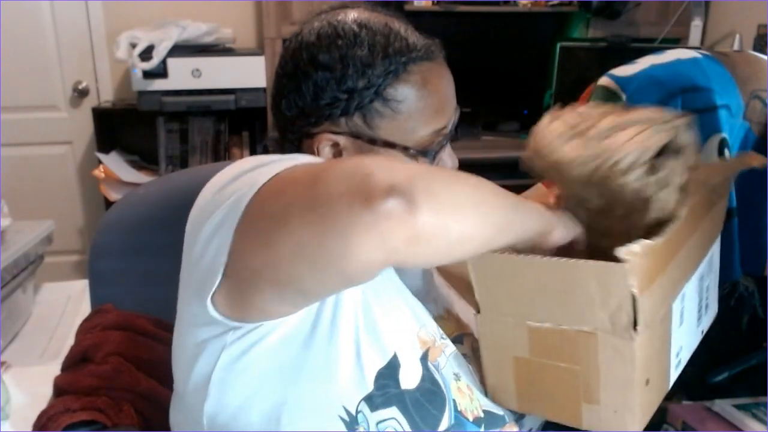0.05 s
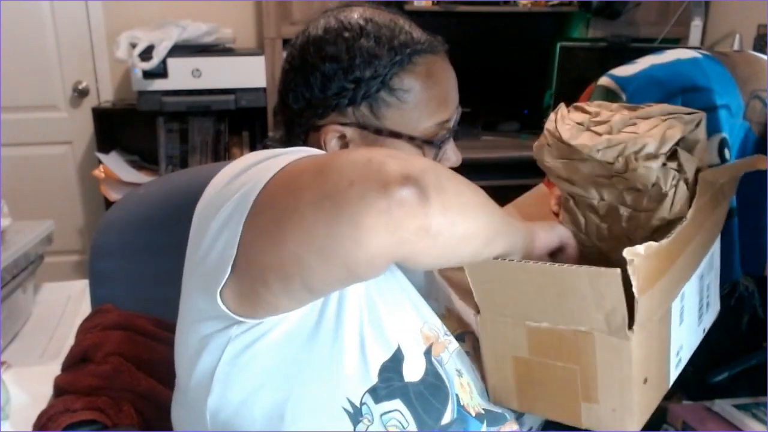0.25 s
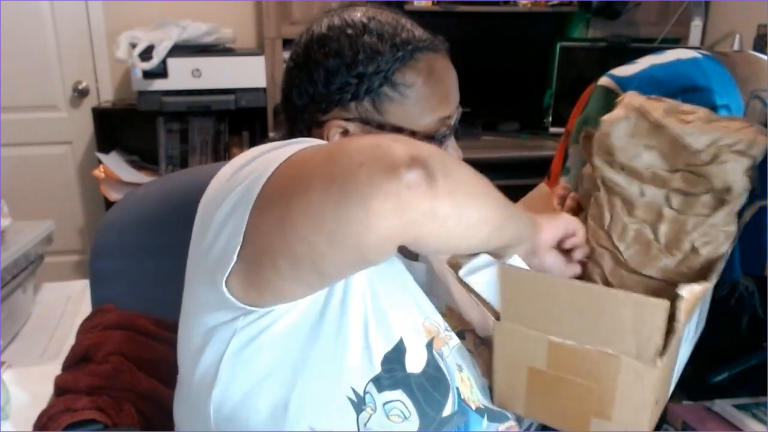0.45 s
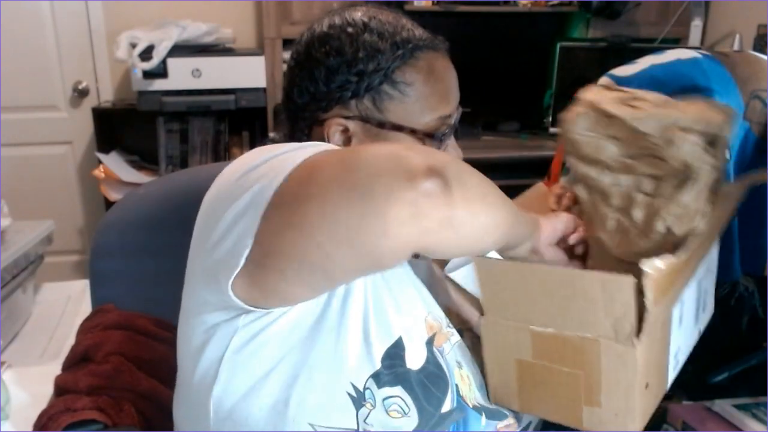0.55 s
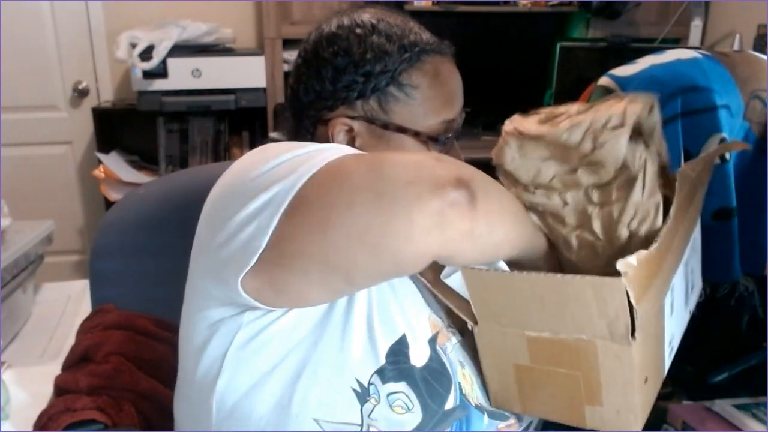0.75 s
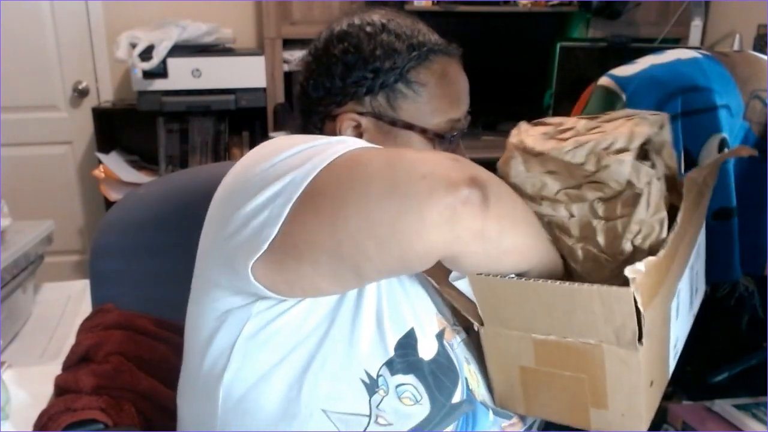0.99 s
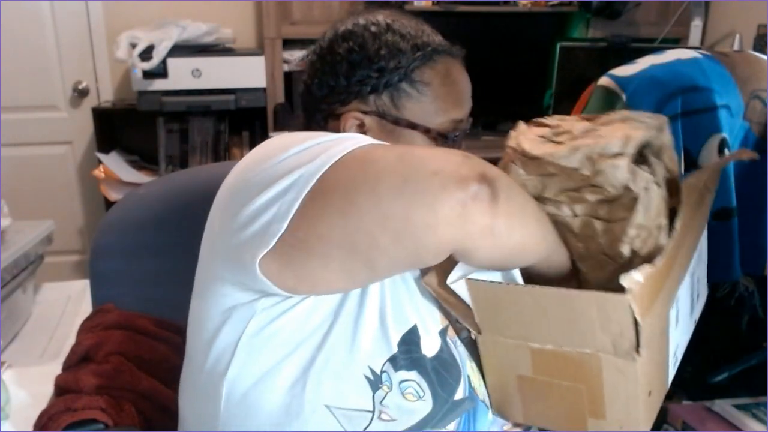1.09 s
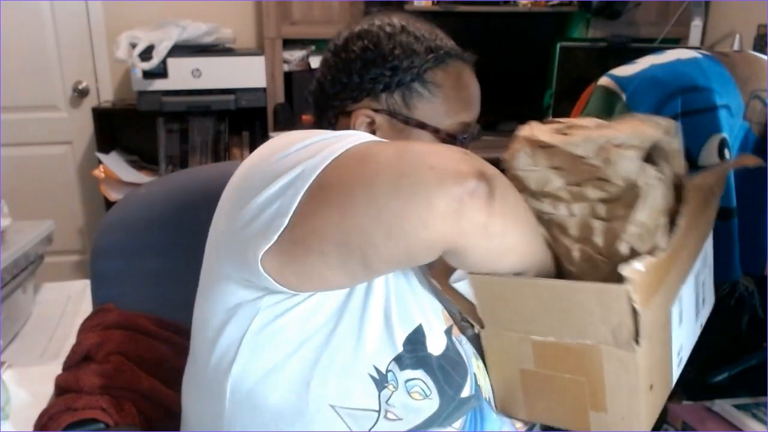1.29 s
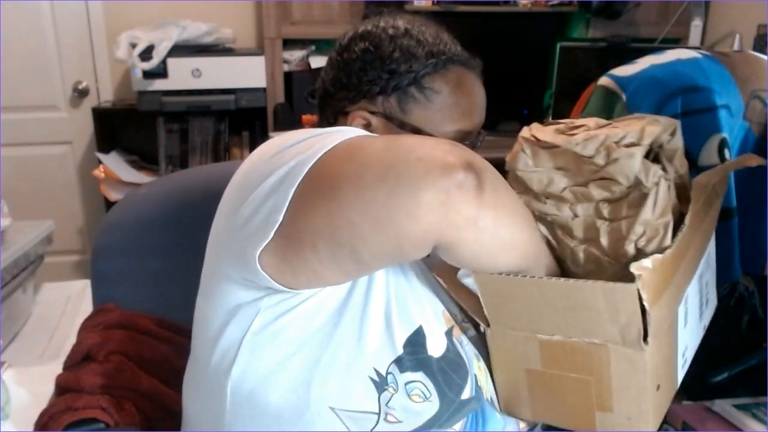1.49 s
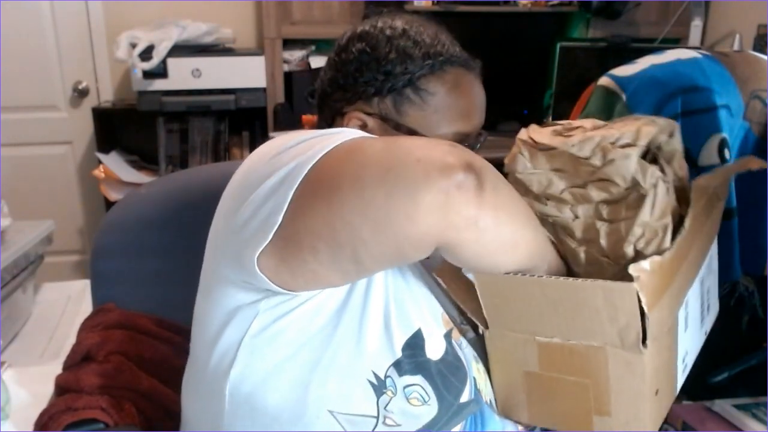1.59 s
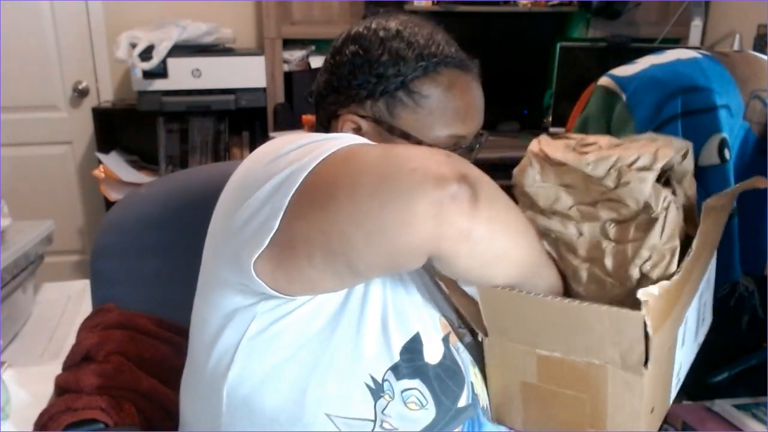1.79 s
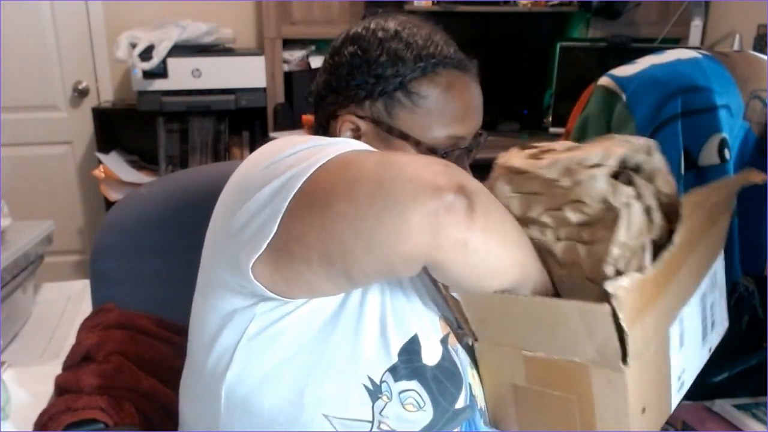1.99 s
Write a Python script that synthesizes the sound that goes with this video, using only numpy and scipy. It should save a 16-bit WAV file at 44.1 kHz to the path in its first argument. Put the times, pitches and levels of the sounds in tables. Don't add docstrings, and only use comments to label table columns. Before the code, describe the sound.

Crumpled kraft paper crunches and snaps as a hand digs in a cardboard box, knocking its sides

```python
import sys
import numpy as np
from scipy import signal
from scipy.fft import rfft, irfft, next_fast_len
from scipy.io import wavfile
from scipy.ndimage import uniform_filter1d

SR = 44100
rng = np.random.default_rng(int(sys.argv[2]) if len(sys.argv) > 2 else 0)


def boost(x):
    u = np.asarray(x, float) / 20
    return 10 ** u


def wav_out(sig):
    wavfile.write(sys.argv[1], SR, np.round(np.clip(np.atleast_2d(sig).T, -1, 1) * 32767).astype(np.int16))


N = 90404


def evened(x):
    return x / np.sqrt(np.mean(x ** 2) + 1e-20)


def read(points, hz):
    point_hz, value = np.transpose(points)
    return np.interp(np.log(hz + 1), np.log(point_hz + 1), value)


def add(mix, start_s, sound):
    part = mix[round(start_s * SR):][:len(sound)]
    part += sound[:len(part)]


def coloured(x, points):
    return irfft(rfft(x) * boost(read(points, np.fft.rfftfreq(N, 1 / SR))), N)


def resonate(x, hz, width):
    turn = np.exp(2j * np.pi * hz * np.arange(len(x)) / SR)
    r = np.exp(-np.pi * width / SR)
    return 2 * (turn * signal.lfilter([1 - r], [1, -r], x / turn)).real


def resonate_twice(x, hz, width):
    return resonate(resonate(x, hz, width), hz, width)


def clicks(per_s, spread_db):
    size = boost(spread_db * np.minimum(rng.exponential(1, N), 4)) * rng.choice([-1., 1.], N)
    return size * (rng.random(N) < per_s / SR)


def force(rows):
    rise_db, fall_db = 14.5, 20.5
    t, power = np.arange(N) / SR, np.zeros(N)
    for start, rise, fall, db in rows:
        late = t - start - rise
        falling = -fall_db * (np.maximum(late, 0) / fall) ** 1.18
        power += boost(db + np.where(late < 0, rise_db * late / rise, falling)) ** 2
    return np.sqrt(power)


# (frequency [Hz], density [dB per Hz])
PAPER = [(290, -6), (600, -15.5), (1000, -7.5), (2200, -8.5), (4000, -8), (7000, -16.5), (9000, -25.5),
         (15500, -26.5)]
# (start [s], rise [s], fall [s], force [dB])
SQUEEZES = [(-.02, 0.0078, 0.088, -30.5), (.075, 0.0036, 0.15, -33.5), (.196, 0.0067, 0.022, -44),
            (.21, 0.028, 0.048, -16.5), (.26, 0.021, 0.1, -19.5), (.32, 0.015, 0.036, -41),
            (.40, 0.022, 0.12, -37.5), (.465, 0.017, 0.24, -30.5), (.56, 0.01, 0.073, -26),
            (.58, 0.0054, 0.18, -30.5), (.63, 0.045, 0.073, -24.5), (.70, 0.035, 0.013, -26.5),
            (.805, 0.0076, 0.059, -47), (.875, 0.026, 0.2, -44.5), (.95, 0.09, 0.12, -38),
            (1.035, 0.035, 0.051, -25.5), (1.055, 0.029, 0.1, -29.5), (1.14, 0.014, 0.084, -30),
            (1.195, 0.0097, 0.1, -34), (1.3, 0.024, 0.23, -52), (1.4, 0.028, 0.048, -47),
            (1.52, 0.026, 0.053, -50), (1.57, 0.01, 0.056, -49), (1.735, 0.0087, .03, -50),
            (1.745, 0.03, 0.19, -41.5), (.14, 0.0078, .09, -37.5), (1.82, 0.027, 0.037, -47),
            (1.97, 0.036, 0.11, -47)]


def crackle():
    creases_per_s, spread_db, slide_db, level_db = 2100, 3, -5.5, -1
    ring_cycles = 2.24
    grains, t = np.zeros(N), np.arange(600) / SR
    for hz in np.geomspace(700, 14000, 24):
        grain = np.sin(2 * np.pi * hz * t) * np.exp(-t * hz / ring_cycles)
        slips = clicks(creases_per_s / 24, spread_db)
        grains += signal.oaconvolve(slips, grain * np.sqrt(hz))[:N]
    paper = evened(grains) + boost(slide_db) * rng.standard_normal(N)
    return boost(level_db) * force(SQUEEZES) * evened(coloured(paper, PAPER))


# (time [s], peak level [dB], pitch [Hz], burst length [s])
SNAPS = [(.0785, -12, 1950, 0.00098), (0.1997, -22.5, 2270, 0.0063), (0.2324, -7, 5400, 0.0078),
         (0.2375, -14, 1600, 0.002), (0.2462, -5, 5300, .002), (0.266, -12.5, 2900, 0.0039),
         (0.299, -12.5, 4300, 0.0051), (0.332, -15, 2580, 0.0082), (0.4893, -10, 3380, 0.00087),
         (0.5636, -5.5, 3770, 0.00094), (0.5669, -10, 2430, 0.0028), (0.5688, -4.5, 3940, 0.0015),
         (0.5656, -7.5, 6010, 0.0019), (.5840, -6, 2350, 0.00092), (.808, -34.5, 1020, 0.0015),
         (1.0422, -22.5, 5150, 0.0068), (1.147, -22, 3400, 0.0041), (1.8388, -30.5, 5300, 0.0012),
         (0.0787, -16, 3900, 0.00076), (.2867, -19.5, 2120, 0.0018), (0.473, -25.5, 2950, 0.0026),
         (0.651, -22.5, 2470, 0.0041), (.8994, -43, 2180, .003), (1.0221, -31, 2600, .003),
         (1.2067, -36, 4000, 0.0026), (1.5812, -41.5, 6000, .001), (1.636, -57, 9000, 0.0011),
         (1.877, -35, 1680, 0.0012), (1.902, -46, 5960, .001), (1.996, -38.5, 3170, .002)]


def snaps():
    level_db, edge_db, relative_width = 1, -20, 0.5
    out, t = np.zeros(N), np.arange(900) / SR
    for start, db, hz, burst in SNAPS:
        drive = rng.standard_normal(900) * np.exp(-(t / max(burst, 3e-4)) ** 2)
        drive[0] += 3.
        ring = evened(resonate_twice(drive, hz, relative_width * hz))
        sound = ring + boost(edge_db) * evened(drive)
        add(out, start, boost(db + level_db) * sound / abs(sound).max())
    return out


def stick_slip(length, db, hz, relative_width):
    t = np.arange(0, 2.02 * length, 1 / SR)
    drive = rng.standard_normal(len(t))
    noise = evened(resonate_twice(drive, hz, relative_width * hz))
    tone = 1.18 * np.sin(2 * np.pi * (hz * t + drive[0]))
    swell = np.sin(np.pi * (t / t[-1]) ** 0.6)
    return boost(db) * swell * evened(noise + tone)


# (start [s], length [s], level [dB], pitch [Hz])
RUBS = [(0.235, 0.006, -21, 1150), (.575, 0.012, -28, 1060), (.718, 0.011, -26.5, 2300),
        (1.037, 0.0068, -14, 1106), (1.055, 0.028, -26.5, 1270), (1.145, 0.0173, -22, 1485),
        (1.197, 0.019, -28.5, 1094), (1.413, 0.032, -48, 1330), (1.578, 0.022, -50.5, 1002),
        (1.677, 0.022, -46, 563), (1.758, 0.036, -38.5, 1520), (1.815, 0.042, -42, 1510),
        (1.86, 0.048, -43.5, 696), (1.986, 0.0228, -48.5, 1000), (1.15, 0.042, -34.5, 673),
        (0.861, 0.016, -47, 1000), (.935, 0.034, -41, 1150), (1.748, 0.0207, -39.5, 414),
        (1.793, 0.038, -35.5, 378), (1.882, .035, -41, 419), (2.028, 0.018, -43, 410),
        (.081, 0.025, -36.5, 2045), (.082, 0.042, -38.5, 1000), (.203, 0.015, -27.5, 430),
        (1.002, 0.012, -29, 1060), (1.199, 0.0066, -25, 1460), (.235, 0.013, -21.5, 2250),
        (.563, 0.0054, -24, 1110), (1.062, 0.022, -29, 540), (.66, 0.039, -27, 270),
        (1.31, 0.045, -49.5, 1400), (1.3, .035, -41.5, 390), (1.24, 0.024, -40, 1000),
        (1.143, 0.011, -32, 3550), (.197, .009, -30, 2200), (.27, .02, -26, 2200), (.33, .045, -36.5, 2200),
        (.655, 0.021, -30, 2450), (1.61, 0.048, -56.5, 1450), (1.45, .04, -51, 400),
        (1.068, .02, -31, 2800), (.69, 0.013, -24.5, 560), (.562, .006, -20, 3950),
        (1.836, .006, -44, 5200), (.91, .03, -46, 620)]


def rubs():
    out = np.zeros(N)
    for start, length, db, hz in RUBS:
        add(out, start, stick_slip(length, db, hz, 0.14))
    return out


# (time [s], peak level [dB], pitch [Hz])
KNOCKS = [(0.251, 2.5, 352), (.236, -4, 355), (0.2858, 3, 345), (0.299, -5, 608), (0.3, -13, 325),
          (0.33, -1.5, 338), (0.679, -10, 402), (0.699, -10.5, 556), (0.712, -18, 320), (0.73, -14, 394),
          (0.7, -17, 350), (0.64, -21, 380), (0.963, -20.5, 367), (1.005, -10, 340), (1.08, -15.5, 450),
          (1.0415, -6.5, 405), (1.362, -30, 375), (1.544, -32, 353)]


def knocks():
    level_db, whole_box_db, t60_s, contact_s = -2.5, -5.5, 0.053, 0.0028
    out, t = np.zeros(N), np.arange(6000) / SR
    for start, db, hz in KNOCKS:
        ring = np.sin(2 * np.pi * hz * t)
        ring += boost(whole_box_db) * np.sin(2 * np.pi * 0.41 * hz * t)
        ring += 0.31 * np.sin(2 * np.pi * 1.58 * hz * t)
        decay = boost(db + level_db - 60 * t / t60_s)
        add(out, start, decay * np.minimum(t / contact_s, 1) * ring)
    return out


# (frequency [Hz], width [Hz], level [dB])
BOX = [(138, 80, -6), (295, 81.6, -4.5), (358.4, 38, 2.5), (392.8, 40, -9.5), (548.4, 40, -7),
       (1015, 370, -18.5), (1151, 140, -13.5)]
# (start [s], rise [s], fall [s], force [dB])
PUSHES = [(-.03, 0.022, 0.062, -20), (.12, 0.019, 0.046, -43), (.195, 0.035, 0.12, -21.5),
          (.235, 0.0065, 0.1, -14), (.29, 0.017, 0.052, -13.5), (.46, 0.062, 0.03, -33.5),
          (.56, 0.053, 0.12, -26), (.63, 0.075, 0.017, -18), (.7, 0.016, 0.03, -19),
          (.9, 0.053, 0.086, -34.5), (1.0, 0.0089, 0.064, -18), (1.04, 0.014, 0.073, -21.5),
          (1.15, 0.077, 0.18, -32), (1.29, 0.058, 0.015, -41), (1.42, 0.087, 0.057, -48.5),
          (1.74, 0.027, 0.093, -40.5), (1.79, 0.038, 0.13, -40.5), (1.87, 0.046, 0.029, -37.5),
          (2.0, 0.048, 0.035, -40)]


def box():
    scuffs_per_s, spread_db, level_db = 500, 3, -1.5
    drive = evened(clicks(scuffs_per_s, spread_db)) + 0.23 * rng.standard_normal(N)
    body = np.zeros(N)
    for hz, width, db in BOX:
        body += boost(db) * evened(resonate_twice(drive, hz, 1.46 * width))
    return boost(level_db) * force(PUSHES) * evened(body)


# (start [s], length [s], level [dB], pitch [Hz])
ROCKS = [(.235, 0.078, -22, 130.7), (0.24, 0.088, -39, 57.6), (.46, 0.057, -35.5, 121.5),
         (.57, 0.061, -32, 165), (.66, 0.031, -63, 112), (1.0, 0.069, -38, 135), (1.28, 0.038, -43, 123),
         (1.4, 0.113, -41.5, 54.4), (1.535, 0.027, -41, 124), (0.072, 0.048, -42.5, 119),
         (1, 0.039, -41, 108), (0.34, .045, -36.5, 161), (.287, .035, -26, 220), (.415, .025, -42, 180),
         (1.27, 0.022, -43, 152), (.76, 0.083, -52.5, 125), (1.04, 0.028, -29, 280)]


def rocks():
    out = np.zeros(N)
    for start, length, db, hz in ROCKS:
        add(out, start, stick_slip(length, db, hz, 0.13))
    return out


# (frequency [Hz], density [dB per Hz])
AIR = [(20, 3.5), (60, 2), (250, -11.5), (560, -13.5), (1500, -22.5), (6000, -29.5), (9000, -45),
       (15500, -43)]


def air():
    return boost(-49) * evened(coloured(rng.standard_normal(N), AIR))


# (frequency [Hz], t60 [s])
ROOM = [(100, 0.056), (1000, .12), (12000, 0.099)]


def room(x):
    taps = np.zeros((2, SR // 2))
    starts = np.arange(60, SR // 2 - 20, 20)
    places = starts + rng.integers(0, 20, (2, len(starts)))
    np.put_along_axis(taps, places, rng.choice([-1., 1.], (2, len(starts))), 1)
    hz, t, z = signal.stft(taps, SR, nperseg=128)
    same = np.clip(900 / (hz + 300), 0, 1)[:, None]
    z[1] = same * z[0] + np.sqrt(1 - same ** 2) * z[1]
    decay = boost(-60 * t / read(ROOM, hz)[:, None])
    tail = signal.istft(z * (hz[:, None] > 200) * decay, SR, nperseg=128)[1]
    return boost(-5) * signal.fftconvolve(x[None], tail / np.linalg.norm(tail[0]), axes=1)[:, :N]


def ports(x, share):
    gap_s, left_db, spread, scatter_hz = 5.5e-5, -1.7, 0.6, 231
    size = next_fast_len(N + 4096)
    hz = np.fft.rfftfreq(size, 1 / SR)
    smooth = round(scatter_hz * size / SR)
    wobble = uniform_filter1d(rng.standard_normal(len(hz)), smooth)
    wobble = evened(uniform_filter1d(wobble, smooth))
    scatter = share * spread * 3.9 * hz / (hz + 4000) * np.tanh(1.5 * wobble)
    turn = np.exp(-1j * (np.pi * hz * gap_s + scatter))
    pair = irfft(rfft(x, size) * np.array([turn, 1 / turn]), size)[:, :N]
    return boost([[left_db / 2], [-left_db / 2]]) * pair


def scene():
    front, far_side = crackle(), crackle()
    near = snaps() + rubs() + knocks() + box() + rocks()
    direct = ports(near + air(), -0.4) + ports(front, 0.78) + ports(far_side, 0.95)
    return direct + room(near + front + far_side)


# (time [s], port [0 left, 1 right], jump [full scale])
OVERFLOWS = [
    (.24042, 0, .9),
    (.25347, 1, .9),
    (.25351, 0, 1.4),
    (.28805, 1, 1.6),
    (.28815, 0, 2),
    (.29212, 0, 1),
]


def overflows(full):
    width_s = 2.6e-5
    t, jumps = np.arange(N) / SR, np.zeros((2, N))
    for start, port, jump in OVERFLOWS:
        sign = -np.sign(full[port, round(start * SR)])
        jumps[port] += sign * jump * np.exp(-((t - start) / width_s) ** 2)
    return jumps


def top_cut(x):
    return signal.sosfilt(signal.butter(12, 15690, fs=SR, output="sos"), x)


def record(dry):
    ceiling, edge_hz = 1.02, 15750
    full = np.clip(dry, -ceiling, ceiling)
    overloaded = np.clip(full + overflows(full), -ceiling, ceiling)
    edge = signal.firwin(511, edge_hz, window=("kaiser", 9), fs=SR)[None]
    limited = signal.oaconvolve(overloaded, edge, "same")
    return top_cut(limited)


dry = scene()
out = record(dry)
wav_out(out)
```